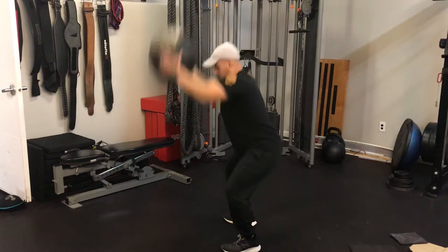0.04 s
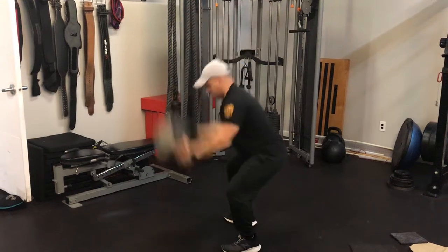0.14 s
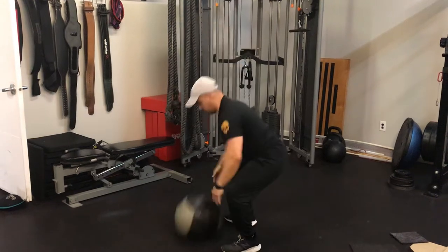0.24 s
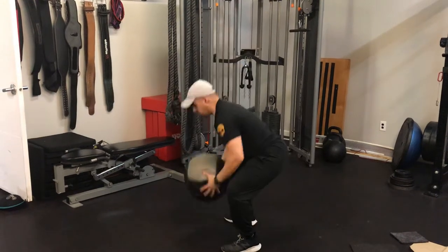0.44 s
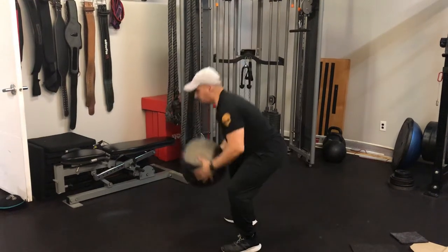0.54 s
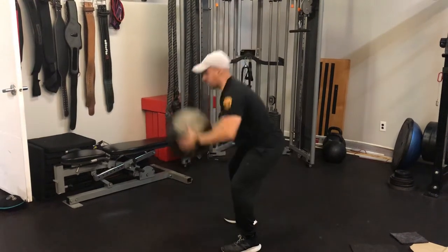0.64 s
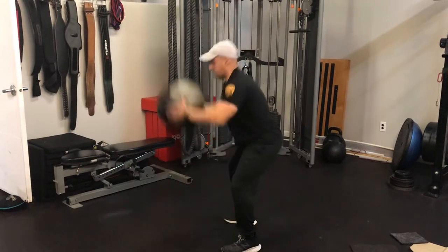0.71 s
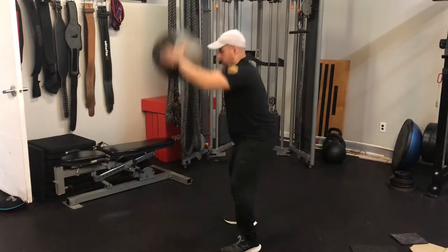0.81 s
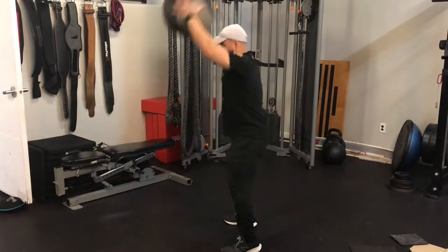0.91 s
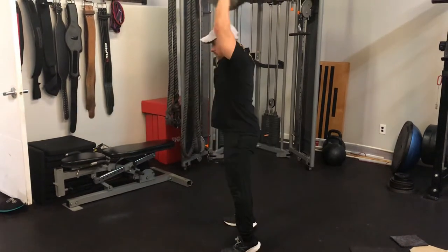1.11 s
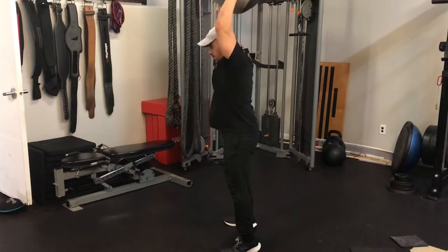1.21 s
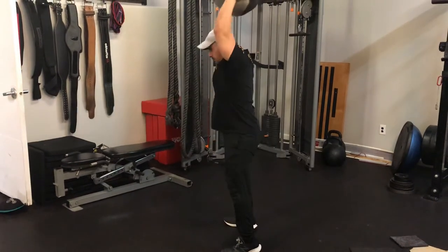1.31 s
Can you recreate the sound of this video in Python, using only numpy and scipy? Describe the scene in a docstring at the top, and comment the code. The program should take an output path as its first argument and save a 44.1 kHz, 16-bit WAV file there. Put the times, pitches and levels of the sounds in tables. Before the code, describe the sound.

One hard ball slam in a reverberant gym, heard in mono: brief whoosh, sharp crack with deep thumps, slightly clipped, then a booming tail with wavering metallic hum fading into quiet room noise and soft cloth rustle.

```python
"""A heavy padded ball is slammed on the rubber floor of a gym, heard by one microphone.
Its cover slaps (filtered spikes), its filling lands in a few deep thumps (short cosine swells),
a hollow boom slides in pitch and the shell rings briefly (decaying sines).
Nearby surfaces and the hall answer with decaying noise; steel equipment hums on in wavering sines.
Filtered noise makes the air rush, the hands, the clothes of throw and next lift, and the quiet room."""
import sys
import numpy as np
from scipy import signal
from scipy.fft import rfft, irfft
from scipy.io import wavfile

SR = 44100
rng = np.random.default_rng(int(sys.argv[2]) if len(sys.argv) > 2 else 0)


def unload_wav(signal):
    """Save mono or channel-first audio to the path in sys.argv[1] as 16-bit WAV at rate SR, clipped to [-1, 1]."""
    wavfile.write(
        sys.argv[1],
        SR,
        np.round(np.clip(np.atleast_2d(signal).T, -1, 1) * 32767).astype(np.int16),
    )


N = 59535  # length [samples]
HIT_S = .2475

# Cracks of the cover and their first reflections:
# (time [s], relative level [dB], lowpass corner [Hz], crackle decay [s])
CRACKS = [(.2475, -9, 6000, .0004), (.2479, -2, 7000, .0003), (.2490, -3.5, 6000, .0002),
          (.2513, -3, 700, .0014), (.2529, -4, 1800, .0012), (.2554, -3, 7000, .0003),
          (.2576, -5, 2500, .001)]
# Tone of the slap: (frequency [Hz], gain [dB])
CRACK_COLOUR = [(100, -16.5), (400, 4), (1000, -14), (1900, 1.5), (3200, -6), (5200, 1), (7000, -5),
                (10500, -8.5), (15000, -30)]
CRACK_DB = 13.5
# Thumps as the ball flattens, its filling lands and it springs back:
# (peak time [s], pitch [Hz], half length [s], level [dB])
THUMPS = [(.2513, 236.5, 0.0027, -8), (0.2516, 758, 0.0016, -11.5), (0.2651, 100, 0.0069, -6),
          (0.2691, 240, 0.0029, -5), (0.2887, 105, .009, -5), (.3110, 110, 0.013, -18),
          (0.336, 60, 0.023, -20), (0.382, 280, 0.0083, -22.5), (0.479, 79, 0.027, -27.5)]
# Boom of the ball as it regains its shape: (time [s], pitch [Hz], level [dB])
BOOM = [(.255, 250, -37), (.280, 263.7, -20.5), (0.301, 223.5, -17), (.316, 240.7, -14.5),
        (.330, 297.5, -16.5), (0.349, 282, -22.5), (.380, 263, -49), (.430, 270, -68)]
# Ringing of the ball's shell: (frequency [Hz], level [dB], t60 [s])
SHELL = [(125, -23.5, .3), (192, -30, 1), (238.4, -20.5, .45), (292.4, -18.5, 0.4), (366, -19, 0.38),
         (541, -28, 0.61), (560, -28, 1)]
SHELL_RISE_S = .03

# Air ahead of the falling ball: (frequency [Hz], relative level [dB per Hz])
RUSH = [(40, -17), (120, -6.5), (220, 5), (330, -0.5), (470, 2.5), (800, -13.5), (1200, -15), (2200, -19.5),
        (5000, -18.5), (9000, -29), (15000, -47)]
RUSH_DB, RUSH_LEAD_S, RUSH_RISE_S, RUSH_FALL_S = -35.5, 0.0087, 0.031, 0.024
# Hands brushing the cover: (frequency [Hz], relative level [dB per Hz])
CATCH = [(500, -20), (4000, -5), (9000, 5), (13000, -1), (16000, -11)]
CATCH_S, CATCH_DB, CATCH_RISE_S, CATCH_FALL_S = 0.452, -54, 0.011, 0.083
# Swishes of clothing: (peak time [s], rise [s], fall [s], level [dB])
SWISHES = [(.11, 0.076, 0.15, -59.5), (.215, .035, .025, -50.5), (.91, 0.24, 0.16, -58.5),
           (1.27, 0.079, 0.08, -68)]
# Tone of the cloth: (frequency [Hz], relative level [dB per Hz])
CLOTH = [(100, -27), (500, 5.5), (1500, 1.5), (4500, -2), (9000, -3.5), (12000, -11.5), (16000, -18.5)]

# Scatter from nearby walls and equipment: (frequency [Hz], relative level [dB per Hz], t60 [s])
NEAR = [(40, -16, .4), (100, 10.5, 0.1), (200, -5, 0.2), (500, -3, 1), (930, -1.5, 0.45), (1728, 3, 0.33),
        (3100, -3.5, 0.26), (4940, -3.5, 0.52), (6150, -9.5, 0.56), (9000, -10, 0.59), (12200, -18, 0.23),
        (15500, -29.5, 0.41)]
NEAR_DB, NEAR_RISE_S = -13.5, 0.0042
# Reverberation of the hall: (frequency [Hz], relative level [dB per Hz], t60 [s])
HALL = [(25, -13.5, 1.4), (65, 3.5, 1.8), (148, 0.5, 1.64), (280, 9, 1.236), (442, -0.5, 1.24),
        (1000, -1.5, 1.32), (1893, 1.5, 1.234), (2960, -2.5, 1.055), (4970, -4, 0.96), (8000, -8, 0.61),
        (11000, -24, .52), (15330, -41, .4)]
HALL_DB, HALL_RISE_S = -16.5, 0.057
# Long ringing of the hall and the steel frames: (frequency [Hz], level [dB], t60 [s])
HUMS = [(70.3, -38, 2.8), (83, -38.5, 2), (102.7, -39, 2.2), (221, -31.5, 2.32), (250, -34.5, 1.5),
        (326.4, -38.5, 2.55), (391, -42.5, 1.5), (488, -47, 2.3), (587, -41.5, 1.6), (613, -41, 1.8)]
HUM_RISE_S, HUM_BEAT_HZ, HUM_PAIR_SHARE = 0.15, 2.2, 0.33
# The quiet room: (frequency [Hz], relative level [dB per Hz])
AMBIENCE = [(25, -7.5), (60, 2.5), (120, 8.5), (300, 1.5), (600, -8), (2000, -20), (5000, -19.5),
            (9000, -26), (15000, -36.5)]
AMBIENCE_DB = -59

# Microphone: bass cut, clipping level (full scale = 1) and upper band edge
LOW_CUT_HZ, CEILING, EDGE_HZ = 36, .98, 15900


def slap(crackle=0.13):
    """Each crack is a sharp pressure spike with a short crackle of the cover."""
    out = np.zeros(N)
    for start_s, db, corner_hz, decay_s in CRACKS:
        age = np.arange(N) - round(start_s * SR)
        spike = age == 0
        fade = (age > 0) * np.exp(-abs(age) / SR / decay_s)
        burst = spike + crackle * fade * rng.standard_normal(N)
        pole = np.exp(-2 * np.pi * corner_hz / SR)
        burst = signal.lfilter([1], [1, -pole], burst)
        out += amp(db) * burst / np.linalg.norm(burst)  # equal energy before the level
    return amp(CRACK_DB) * coloured(out, CRACK_COLOUR)


def thumps():
    """Each thump is a short swell of a few deep cycles, its central peak pointing down."""
    out = np.zeros(N)
    for peak_s, hz, half_s, db in THUMPS:
        t = clock(peak_s)
        out -= amp(db) * swell(peak_s, half_s, half_s) * np.cos(2 * np.pi * hz * t)
    return out


def boom():
    """A hollow tone that sags while the ball is flat and rises as it springs back."""
    times, pitches, levels = np.transpose(BOOM)
    t = clock(0)
    sounding = (t > times[0]) * (t < times[-1])
    pitch = np.interp(t, times, pitches) * (t > times[0])
    phase = 2 * np.pi * np.cumsum(pitch) / SR
    return amp(np.interp(t, times, levels)) * sounding * np.sin(phase)


def shell():
    """The shell of the ball rings in a few modes, each decaying at its own rate."""
    return ring(SHELL, SHELL_RISE_S)


def air_rush():
    """Air rushes ahead of the ball as it nears the floor: a swell of noise peaking before the hit."""
    return amp(RUSH_DB) * swell(HIT_S - RUSH_LEAD_S, RUSH_RISE_S, RUSH_FALL_S) * noise(RUSH)


def catch():
    """Hands brush the cover as they catch the rebound: a soft puff of bright noise."""
    return amp(CATCH_DB) * swell(CATCH_S, CATCH_RISE_S, CATCH_FALL_S) * noise(CATCH)


def clothes():
    """Clothes swish as the arms move: rubbing cloth as noise in slow swells."""
    movement = sum(amp(db) * swell(peak_s, rise_s, fall_s) for peak_s, rise_s, fall_s, db in SWISHES)
    return movement * noise(CLOTH)


def near_scatter():
    """Nearby walls and equipment scatter the hit in echoes that build up within milliseconds."""
    return tail(NEAR, NEAR_DB, NEAR_RISE_S)


def hall():
    """The hall booms: its dense echoes build up more slowly than the near scatter."""
    return tail(HALL, HALL_DB, HALL_RISE_S)


def hums():
    """Hall and steel frames hum on in long modes; close pairs of tones beat."""
    return ring(HUMS, HUM_RISE_S, HUM_BEAT_HZ, HUM_PAIR_SHARE)


def ambience():
    """The quiet room is steady, mostly low noise."""
    return amp(AMBIENCE_DB) * noise(AMBIENCE)


def ring(modes, rise_s, beat_hz=0, pair_share=0):
    """Modes that build up after the hit and die away; a close partner can make each one waver."""
    t = np.maximum(clock(HIT_S), 0)
    out = np.zeros(N)
    draws = rng.random((len(modes), 2))
    for (hz, db, t60), (spread, turn) in zip(modes, draws):
        partner_hz = hz + beat_hz * (.5 + spread)
        partner = np.sin(2 * np.pi * (partner_hz * t + turn))
        tone = np.sin(2 * np.pi * hz * t) + pair_share * partner
        out += amp(db - 60 * t / t60) * tone
    return (1 - np.exp(-t / rise_s)) * out


def tail(bands, level_db, rise_s, count=30):
    """Dense echoes of the hit as noise; each band dies at its own speed."""
    t, hz = np.maximum(clock(HIT_S), 0), np.fft.rfftfreq(N, 1 / SR)
    spectrum = rfft(rng.standard_normal(N))
    shape = evened(amp(read(bands, hz)))
    centres = np.geomspace(30, 16000, count)
    out = np.zeros(N)
    for centre, pick in zip(centres, np.eye(count)):
        gain = shape * np.interp(hz, centres, pick)  # triangular, overlapping bands
        t60 = read(bands, centre, axis=2)
        envelope = (1 - np.exp(-t / rise_s)) * amp(-60 * t / t60)
        band = irfft(spectrum * gain, N) * envelope
        # hold each band at its expected level whatever the draw
        out += evened(band) * np.sqrt(np.mean(gain ** 2) * np.mean(envelope ** 2))
    return amp(level_db) * out


def swell(peak_s, rise_s, fall_s):
    """A smooth bell-shaped rise and fall, reaching 1 at its peak."""
    t = clock(peak_s)
    return np.exp(-(t / np.where(t < 0, rise_s, fall_s)) ** 2)


def noise(colour):
    """Steady noise of rms 1 with the given spectrum."""
    gain = amp(read(colour, np.fft.rfftfreq(N, 1 / SR)))
    return evened(irfft(rfft(rng.standard_normal(N)) * gain, N))


def coloured(x, colour, size=2048):
    """Causal minimum-phase filter: nothing sounds ahead of a click."""
    log_gain = np.log(amp(read(colour, abs(np.fft.fftfreq(size, 1 / SR)))))
    response = np.exp(np.conj(signal.hilbert(log_gain)))
    return signal.fftconvolve(x, np.fft.ifft(response).real)[:N]


def read(points, hz, axis=1):
    """Reads one column of a table along log frequency."""
    table = np.transpose(points)
    return np.interp(np.log(hz + 1), np.log(table[0]), table[axis])


def clock(start_s):
    """Seconds since start_s, negative before it."""
    return np.arange(N) / SR - start_s


def evened(x):
    """Scales to rms 1."""
    return x / np.sqrt(np.mean(x ** 2) + 1e-20)


def amp(db):
    """Decibels to gain."""
    return 10 ** (np.asarray(db) / 20)


def scene():
    """The ball, the gym's answer, the thrower and the quiet room, on one channel."""
    ball = slap() + thumps() + boom() + shell()
    gym = near_scatter() + hall() + hums()
    throw = air_rush() + clothes() + catch()
    return (ball + gym + throw + ambience())[None]


def record(dry):
    """The microphone drops the deepest bass, the highest peaks clip; then the treble is band-limited."""
    hz = np.fft.rfftfreq(N, 1 / SR)
    steepness = 8
    bass_cut = (1 - 1 / (1 + (hz / LOW_CUT_HZ) ** steepness)) ** .5
    heard = irfft(rfft(dry) * bass_cut, N)
    clipped = np.clip(heard, -CEILING, CEILING)
    lowpass = signal.firwin(511, EDGE_HZ, window=("kaiser", 9), fs=SR)
    return signal.oaconvolve(clipped, lowpass[None], "same")


dry = scene()
out = record(dry)
unload_wav(out)
```